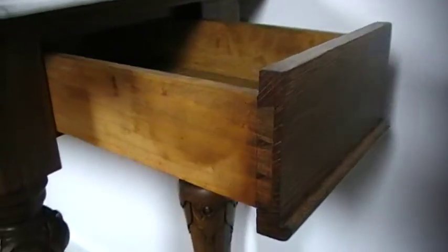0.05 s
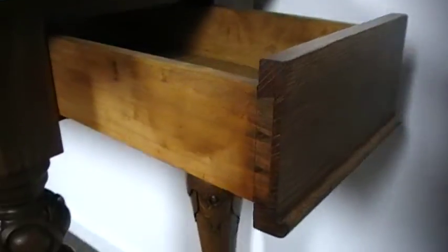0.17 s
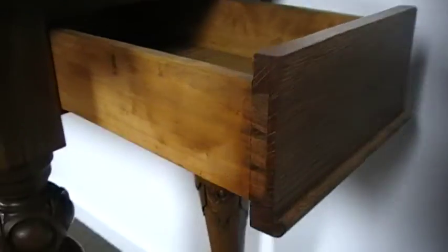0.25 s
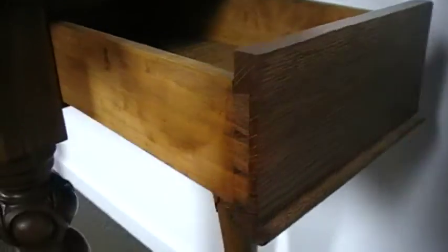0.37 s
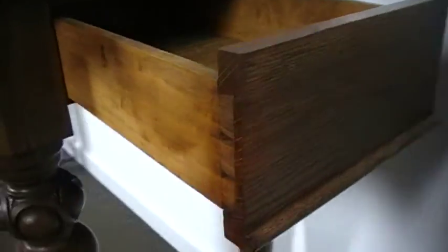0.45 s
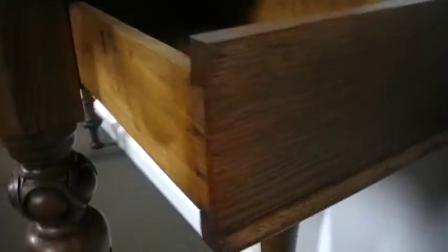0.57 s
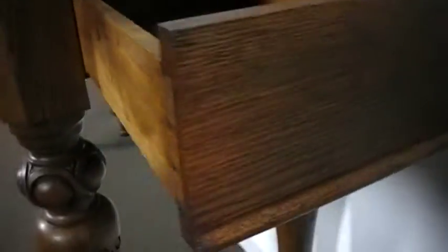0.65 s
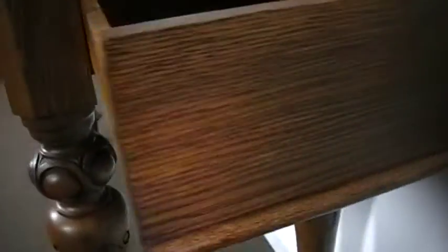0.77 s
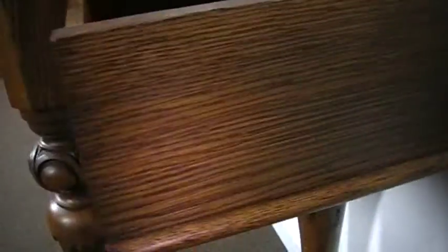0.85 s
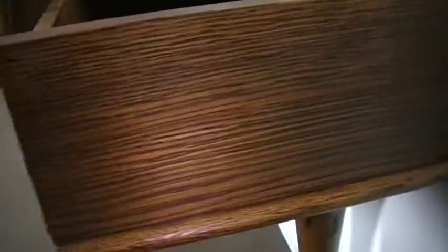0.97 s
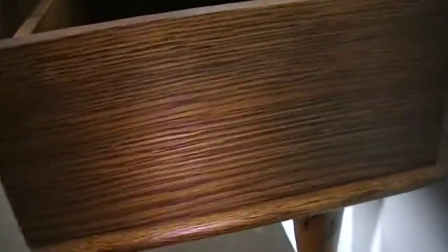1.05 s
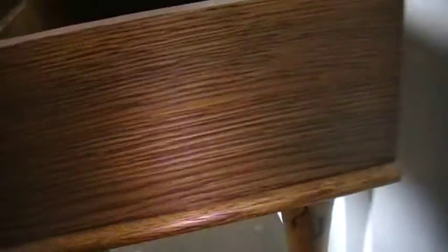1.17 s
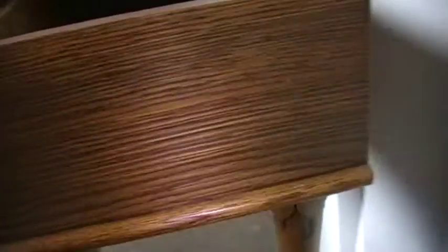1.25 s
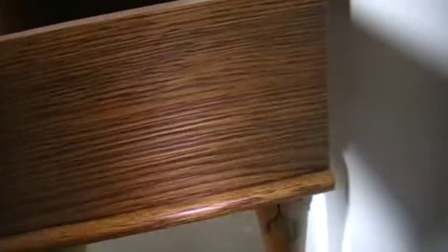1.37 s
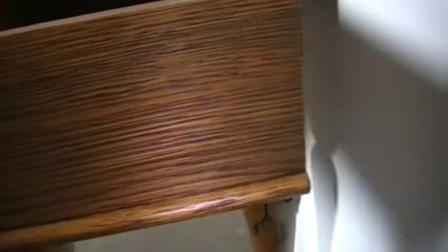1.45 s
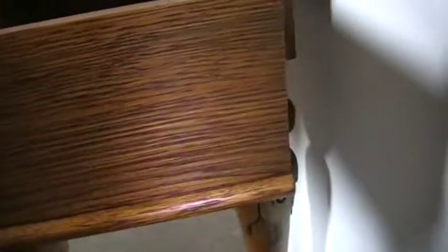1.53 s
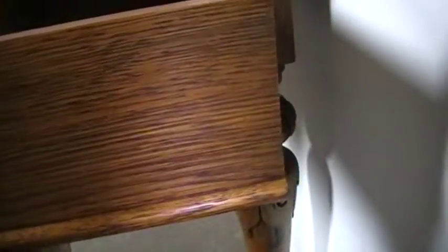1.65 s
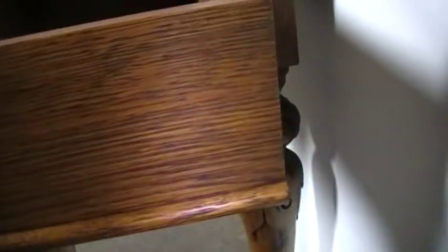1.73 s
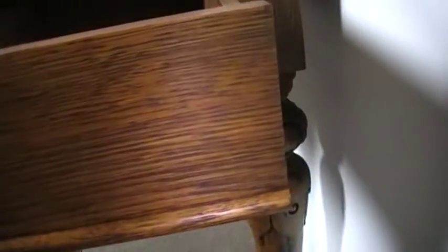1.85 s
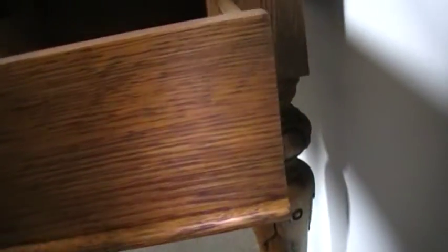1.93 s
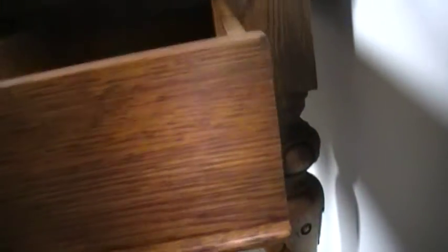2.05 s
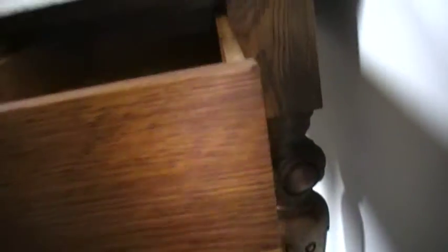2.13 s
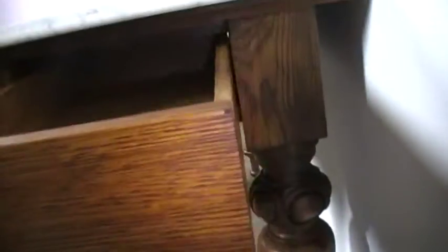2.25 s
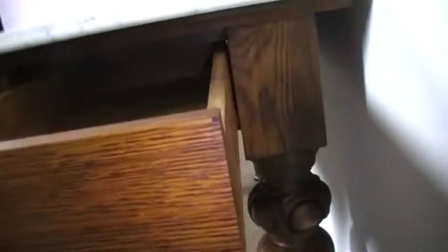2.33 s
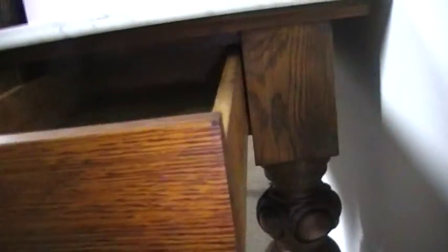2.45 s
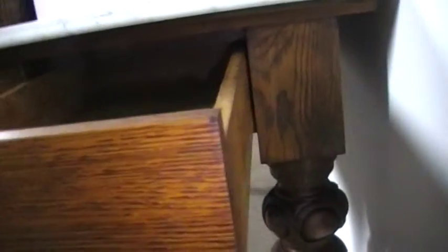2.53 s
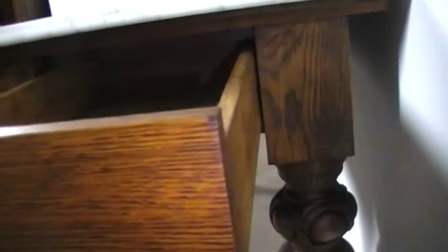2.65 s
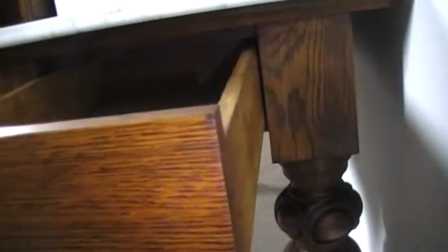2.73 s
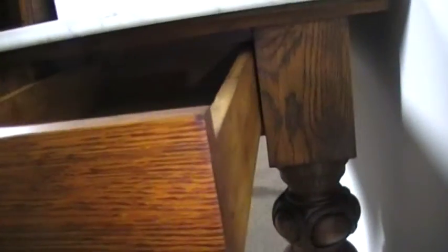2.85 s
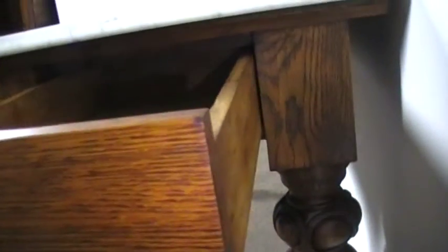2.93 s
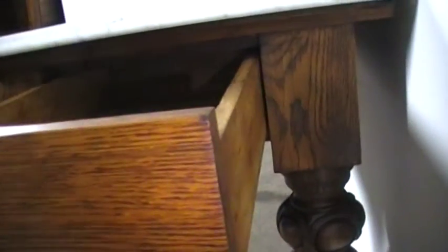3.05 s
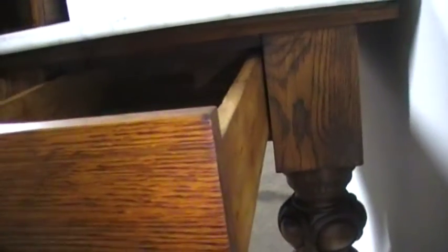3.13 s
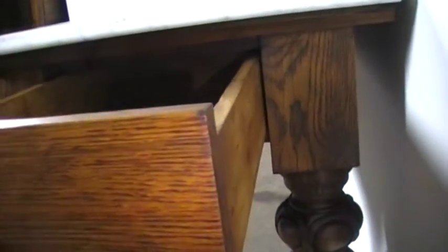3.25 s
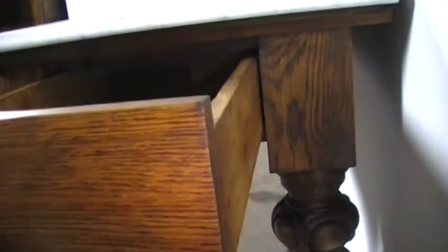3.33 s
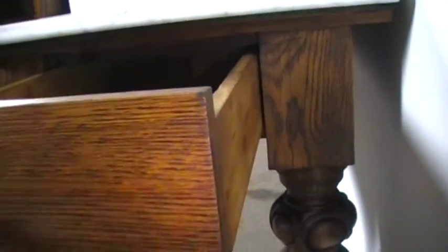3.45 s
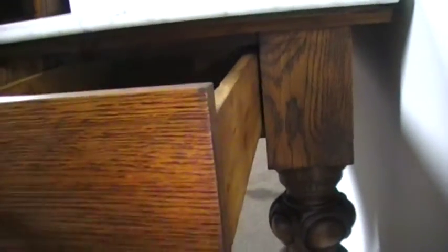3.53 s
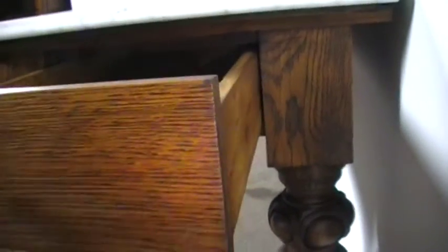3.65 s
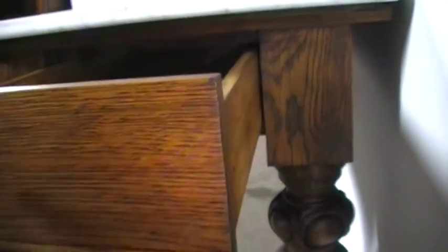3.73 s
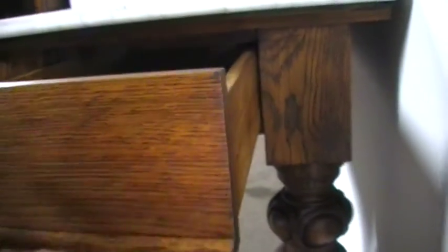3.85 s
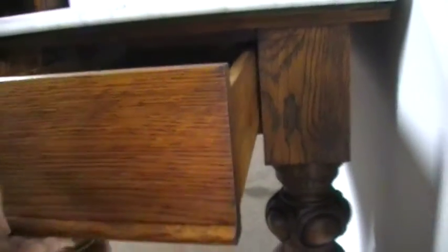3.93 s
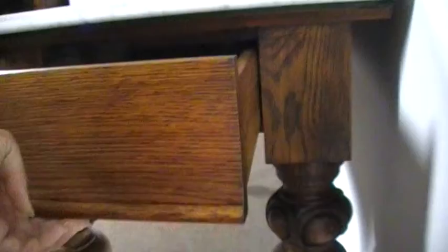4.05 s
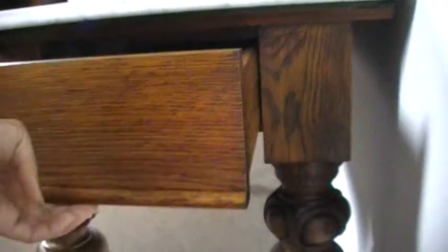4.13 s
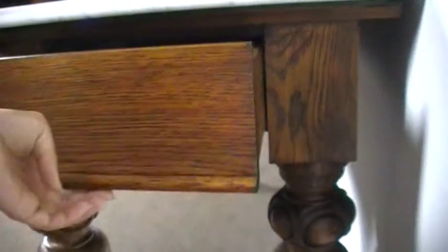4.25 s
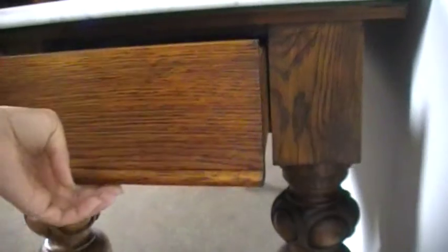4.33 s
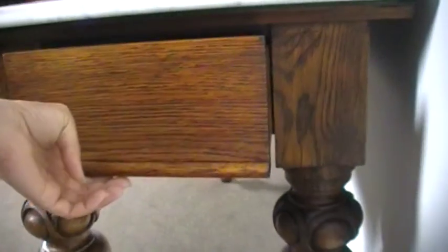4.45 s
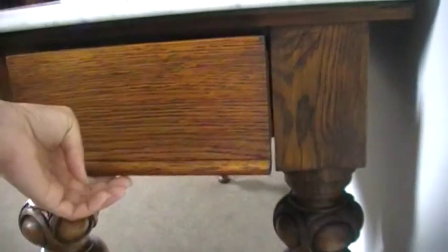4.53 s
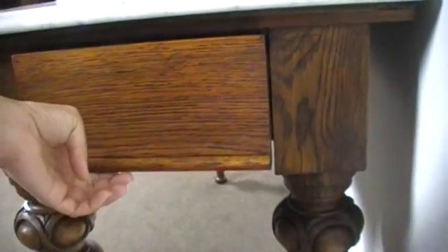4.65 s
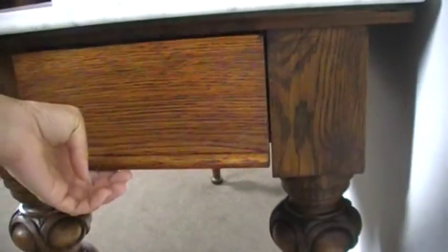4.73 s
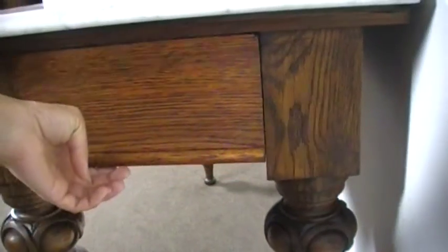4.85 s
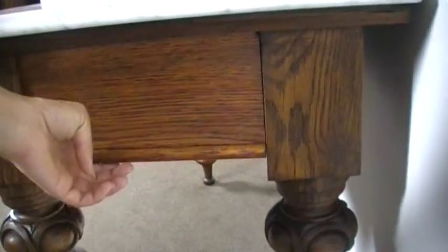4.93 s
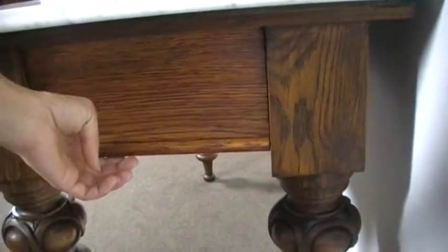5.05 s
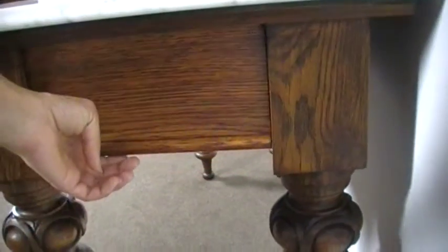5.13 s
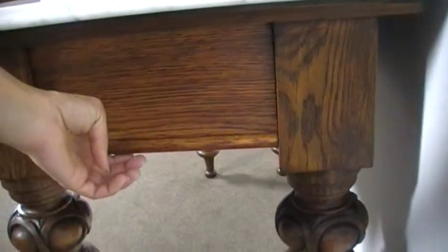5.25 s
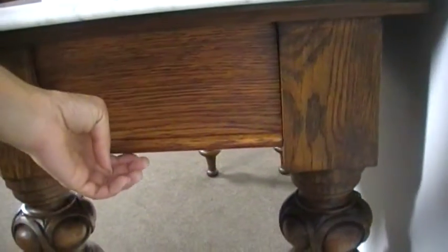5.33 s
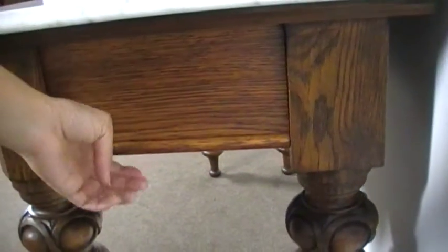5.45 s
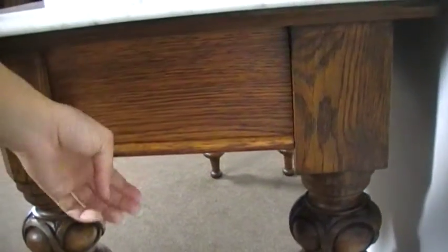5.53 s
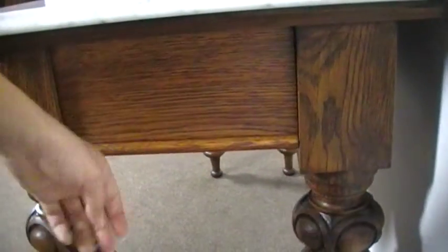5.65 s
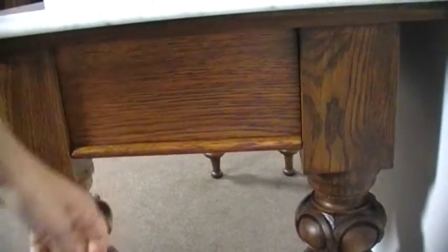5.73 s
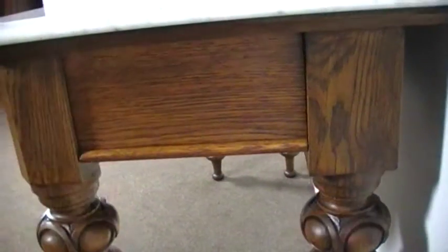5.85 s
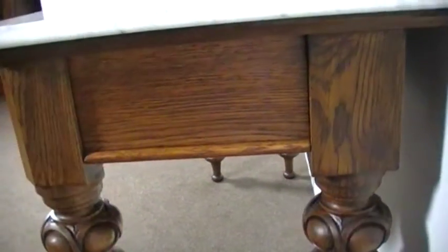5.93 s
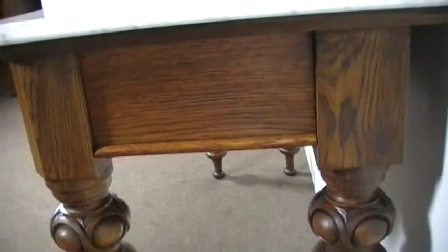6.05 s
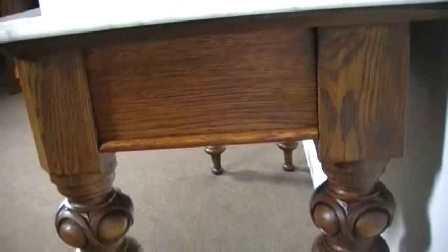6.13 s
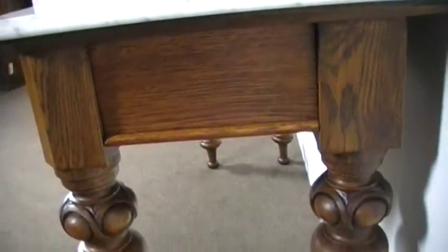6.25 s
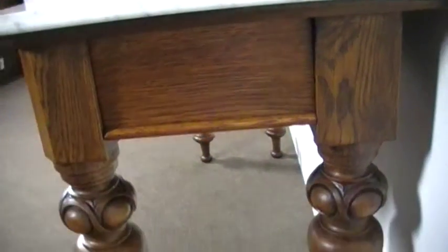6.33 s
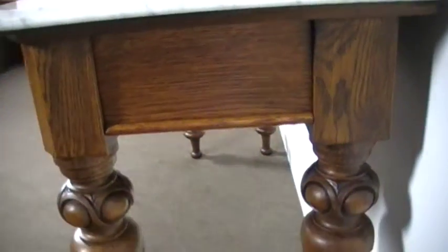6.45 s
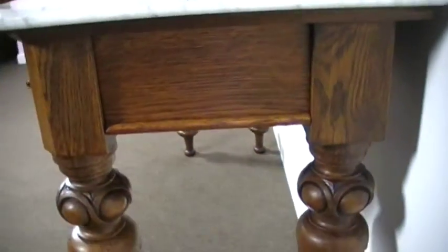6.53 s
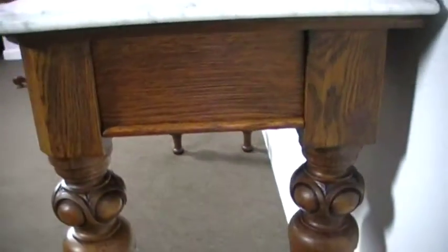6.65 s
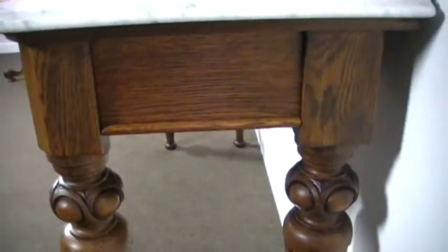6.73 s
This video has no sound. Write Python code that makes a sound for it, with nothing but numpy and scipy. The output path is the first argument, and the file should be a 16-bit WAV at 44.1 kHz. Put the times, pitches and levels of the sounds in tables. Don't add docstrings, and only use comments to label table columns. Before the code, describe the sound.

Close handheld pickup in a carpeted showroom. Cloth rubs and case ticks sit over low room noise. Hollow wooden bumps come first, then after a gap a drawer slides on dry wooden runners, catching and juddering with low woody moans and gritty hiss. It slams into its frame with a hard crack, rattles and leaves a brief reverberant tail, then near quiet with a faint shoe scuff.

```python
import sys
import numpy as np
from scipy import signal
from scipy.fft import rfft, irfft, next_fast_len
from scipy.io import wavfile
from scipy.ndimage import uniform_filter1d

SR = 44100
rng = np.random.default_rng(int(sys.argv[2]) if len(sys.argv) > 2 else 0)


def generate_wav(sig):
    pcm = np.round(np.clip(np.atleast_2d(sig).T, -1, 1) * 32767).astype(np.int16)
    wavfile.write(sys.argv[1], SR, pcm)


def volts_from_decibels(level):
    exponent = np.asarray(level, float) / 20
    return 10 ** exponent


N = 299429
HOP = 128
STROKE = slice(2 * SR, round(5.3 * SR))

# start in seconds, peak level in dB, contact time in ms,
# favoured pitch in Hz, log spread of pitch.
SLAM = [
    (4.9692, -4.5, 1.66, 1297, .4),
    (4.9701, -3.5, 1.43, 4010, 0.62),
    (4.972, -21.5, 8.5, 200, 0.44),
]


def evened(x):
    return x / np.sqrt(np.mean(x ** 2) + 1e-20)


def read(points, hz):
    f, value = np.transpose(points)
    return np.interp(np.log(hz + 1), np.log(f + 1), value)


def add(mix, s, sound):
    part = mix[..., round(s * SR):][..., :sound.shape[-1]]
    part += sound[..., :part.shape[-1]]


def colour(x, points):
    size = next_fast_len(x.shape[-1], True)
    gain = volts_from_decibels(read(points, np.fft.rfftfreq(size, 1 / SR)))
    return irfft(rfft(x, size) * gain, size)[..., :x.shape[-1]]


def resonate(x, hz, width):
    r = np.exp(-np.pi * width / SR)
    zeros = [(1 - r * r) / 2, 0, (r * r - 1) / 2]
    poles = [1, -2 * r * np.cos(2 * np.pi * hz / SR), r * r]
    return signal.lfilter(zeros, poles, x)


def drift(per_s):
    t = np.arange(0, N, HOP) / SR
    f = np.geomspace(per_s / 8, per_s, 12)
    phase = rng.random(12)
    return evened(np.sin(2 * np.pi * (f * t[:, None] + phase)) @ f ** -.5)


def fine(x, span=slice(None)):
    return np.interp(np.arange(N)[span], np.arange(0, N, HOP), x)


def peak_shape(t, s, rise, fall):
    return 1 - np.maximum((s - t) / rise, (t - s) / fall)


def swells(rows, width_share, grit):
    out = np.zeros(N)
    lead = 2000
    for s, length, hz, db in rows:
        part = grit[round(s * SR) - lead:][:round(length * SR) + lead]
        width = width_share * hz
        note = resonate(resonate(part, hz, width), hz, 2 * width)[lead:]
        add(out, s, volts_from_decibels(db) * evened(note) * signal.windows.tukey(len(note), .6))
    return out


def catches(per_s, spread_db):
    size = volts_from_decibels(spread_db * np.minimum(rng.exponential(1, N), 5)) * rng.standard_normal(N)
    return evened(size * (rng.random(N) < per_s / SR))


def hush():
    # frequency in Hz, density in dB per Hz.
    common_hush = [(15, -59), (25, -38), (99, -5), (195, -8), (427, -11.5), (545, -8), (714, -9.5),
                   (840, -8.5), (1520, -12.5), (2160, -15), (2350, -15.5), (9070, -27.5), (16000, -38)]
    opposed_hush = [(15, -61), (25, -32.5), (270, -10), (384, -8.5), (463, -7.5), (503, -8.5), (714, -6.5),
                    (775, -6), (7110, -29.5), (9570, -28.5), (16000, -46.5)]
    # frequency in Hz, rms level in dB.
    whine = [(726.7, -76), (1093, -82), (2186, -74.5), (3214, -88.5), (4377, -92), (15622, -101)]
    common_db, opposed_db = -63 - 2.5, -60
    t = np.arange(N) / SR
    mid = fine(volts_from_decibels(common_db + 0.62 * drift(3.04))) * evened(colour(rng.standard_normal(N), common_hush))
    for hz, db in whine:
        phase = 2 * np.pi * hz * t + fine(0.22 * drift(16))
        mid = mid + fine(volts_from_decibels(db + 0.79 * drift(8.8))) * np.sqrt(2) * np.sin(phase)
    side = fine(volts_from_decibels(opposed_db + 0.3 * drift(4.7))) * evened(colour(rng.standard_normal(N), opposed_hush))
    return np.array([mid + side, mid - side]) * volts_from_decibels(np.array([[.7], [-.7]]))


def rustle():
    # peak time in seconds, level in dB, rise in seconds,
    # fall in seconds, texture (0 rub, 1 scuff, 2 fizz).
    moves = [(.04, -62, 0.046, .2, 1.36), (.19, -55.5, 0.21, 0.17, 1.36), (.41, -62, 0.12, 0.079, 1.35),
             (.495, -60, 0.036, 0.21, 1.35), (.67, -61.5, 0.44, 0.1, 1.3), (.93, -65.5, 0.46, 0.62, 0.84),
             (.9, -67.5, 1, 1.6, 2.42), (1.78, -62, 0.11, 0.061, 0.79), (1.86, -68, 0.083, 0.12, 1.4),
             (2.05, -51, .006, 0.026, 1.2), (2.12, -58.5, 0.2, 0.099, 0.27), (2.121, -58.5, 0.1, 0.15, 1.4),
             (2.29, -56, 0.12, 0.11, 1.53), (2.44, -61.5, 0.54, 0.24, 0.35), (2.79, -62, 0.2, 0.55, 0.27),
             (2.8, -68, 0.46, 0.63, 1.5), (6.15, -77, 0.39, 0.24, 0.082), (6.43, -61, 0.18, 0.39, 1.2),
             (6.586, -55, 0.28, 0.027, 1.47), (6.742, -65, .03, 0.027, 1.5), (6.79, -71, .05, .05, 1.2)]
    # frequency in Hz, density in dB per Hz.
    rub_band = [(120, -0.5), (300, 11.5), (600, 10), (1000, -4), (2000, -46)]
    scuff_band = [(600, -17), (1000, -2), (1250, -5), (1550, -3.5), (1900, -6), (3500, -24.5)]
    fizz_band = [(1500, -21), (2600, 6), (5000, 1), (9000, -1.5), (12000, -10), (16000, -36)]
    # start in seconds, length in seconds, pitch in Hz,
    # rms level in dB.
    drags = [
        (.13, .05, 1730, -65),
        (.17, 0.032, 1390, -55),
        (0.498, 0.027, 1950, -62),
        (.55, 0.092, 1540, -65),
        (0.858, 0.054, 1300, -69),
        (6.387, 0.093, 1490, -57.5),
        (6.452, .07, 1350, -55),
        (6.51, .07, 1410, -51),
        (6.571, 0.033, 1220, -53),
    ]
    edge_db, texture_db = 21.5, 12.5
    t = np.arange(0, N, HOP) / SR
    power = np.zeros((3, len(t)))
    for s, db, rise, fall, texture in moves:
        swell_db = edge_db * (peak_shape(t, s, rise, fall) - 1)
        mismatch_db = texture_db * (np.arange(3)[:, None] - texture) ** 2
        power += volts_from_decibels(db + swell_db - mismatch_db) ** 2
    fibres = catches(9000, 1.6) * fine(volts_from_decibels(1.2 * drift(30)))
    out = volts_from_decibels(-7.5) * swells(drags, 0.2, fibres)
    for gain, band in zip(np.sqrt(power), (rub_band, scuff_band, fizz_band)):
        out += fine(gain) * evened(colour(fibres, band))
    return out


def ticks():
    # start in seconds, peak level in dB, ring in Hz, length in ms, # balance in
    # dB (the left port is louder than the right by half this).
    case_ticks = [(0.0368, -66, 3500, 1.8, -3.0), (0.1204, -54, 5000, 3.1, 3), (0.2976, -46, 5800, 2.1, -1),
                  (0.6294, -62, 4500, 1.3, 0), (1.8372, -68, 5000, 1.8, -2.5), (1.8627, -67, 5000, 2.8, 0),
                  (1.922, -63, 4960, 2.8, -3), (2.018, -56, 3900, 2.3, 0), (2.047, -66, 5000, 2.5, 1),
                  (2.118, -63, 5000, 3, 4), (2.263, -55, 3600, 2.7, -1), (2.289, -55, 5000, 2.3, -1.5),
                  (2.446, -59, 3750, 2.9, -2), (2.5905, -51, 6900, 3, 2), (3.1917, -61, 4000, 3, 0),
                  (3.24, -55, 5000, 7.1, 5), (3.898, -50, 4000, 3, 0), (4.0283, -41, 7000, 3.3, 2),
                  (4.277, -39, 10000, 3.8, 0), (3.268, -53, 4000, 3, 0), (3.67, -47, 7200, 3, 0),
                  (4.105, -47, 9000, 3, 0), (4.72, -50, 9000, 4, 2), (4.89, -40.5, 7500, 4, 3),
                  (5.2642, -56, 5000, 1.4, 3), (5.4534, -58.5, 5120, 2.4, 0), (6.59, -65, 4970, 2.8, 1),
                  (6.5994, -56.5, 4900, 1.3, -9), (6.7435, -59, 3000, 1.3, -4)]
    # start in seconds, peak level in dB, ring in Hz, length in ms, # balance in dB (the left
    scuffs = [
        (0.183, -52.5, 2500, 16, 10),
        (.484, -61, 4000, 15, 6),
        (0.516, -61, 3500, 10, 1),
        (6.568, -59, 5350, 12, 7),
    ]
    # start in seconds, peak level in dB, ring in Hz, balance in dB # (the left port is
    clacks = [(.036, -65, 915, 0), (.1204, -58.5, 2900, 2), (0.299, -58.5, 2900, 0),
              (0.41, -63, 1280, -3.0), (0.533, -58, 1310, 6), (.535, -63, 2000, 0), (0.66, -63, 900, 0),
              (0.609, -65, 1580, -3.0), (0.663, -60.5, 860, 6), (.666, -63, 1940, 0), (0.89, -63, 1290, 4),
              (0.91, -56, 1300, 4), (6.541, -52, 1380, -3.5), (6.543, -63, 2980, 0), (6.577, -54, 1200, 4)]
    tick_width_share, scuff_width_hz, clack_width_hz, clack_ms = 1.5, 7500, 280, 1.8
    rows = [(s, db, hz, tick_width_share * hz, ms, pan_db) for s, db, hz, ms, pan_db in case_ticks]
    rows += [(s, db, hz, scuff_width_hz, ms, pan_db) for s, db, hz, ms, pan_db in scuffs]
    rows += [(s, db, hz, clack_width_hz, clack_ms, pan_db) for s, db, hz, pan_db in clacks]
    out, t = np.zeros((2, N)), np.arange(2500) / SR
    grit = rng.standard_normal((len(rows), 2, 2500))
    for (s, db, hz, width, ms, pan_db), (common, other) in zip(rows, grit):
        ports = np.array([common, 0.45 * common + 1.9 * other])
        puff = t * np.exp(-t * 1000 / ms * 2.9) * ports
        tick = resonate(resonate(puff, hz, width), hz, 2 * width)
        pan = volts_from_decibels(np.array([[pan_db / 4], [-pan_db / 4]]))
        add(out, s, volts_from_decibels(db + 14.5) * tick / abs(tick).max() * pan)
    return out


def blows(rows, modes):
    crack_1k_db, crack_db_per_oct, crack_min_db, crack_max_db = -19, 11, -31, -2.5
    crack_reach = 7.3
    spot_luck_db, touch, long = 1.8, 0.46, 1500
    out, t = np.zeros(N), np.arange(16000) / SR
    luck = rng.standard_normal((len(rows), len(modes)))
    grit = rng.standard_normal((len(rows), long))
    hz, level_db, t60 = np.transpose(modes)
    rings = volts_from_decibels(-60 * t[:, None] / t60) * np.sin(2 * np.pi * hz * t[:, None])
    for (s, db, ms, spot_hz, spread), spot, rough in zip(rows, luck, grit):
        crack_db = crack_1k_db + crack_db_per_oct * np.log2(spot_hz / 1000)
        crack_db = np.clip(crack_db, crack_min_db, crack_max_db)
        u = t[:long] / (ms / 1000)
        force = rough * u * np.exp(-3 * u)
        force = force / np.linalg.norm(force) + touch * (np.arange(long) == round(ms * SR / 4000))
        nearness = 1 / (1 + (np.log(hz / spot_hz) / spread) ** 4)
        ring = signal.fftconvolve(rings @ (volts_from_decibels(level_db + spot_luck_db * spot) * nearness), force)
        crack_filter = signal.butter(N=2, Wn=min(crack_reach * spot_hz, .45 * SR), fs=SR)
        crack = signal.lfilter(*crack_filter, force)
        add(ring, 0, volts_from_decibels(crack_db) * abs(ring).max() * crack / abs(force).max())
        add(out, s, volts_from_decibels(db) * ring / abs(ring).max())
    return signal.sosfilt(signal.butter(N=2, Wn=130, btype="high", fs=SR, output="sos"), out)


def bump_open_drawer():
    # start in seconds, peak level in dB, contact time in ms, favoured pitch in Hz,
    # log spread of pitch.
    hand_bumps = [(2.0465, -37, 1.4, 1000, 0.091), (2.139, -25.5, 5.7, 1800, 0.74),
                  (2.1445, -17, 3.4, 470, 0.17), (2.1845, -21, 2.5, 600, 0.32),
                  (2.1875, -19.5, 2.7, 1310, 0.58), (2.194, -15, 3.3, 830, 0.3),
                  (2.208, -30, 3.8, 600, 0.46), (2.226, -28.5, 3.8, 350, 0.61), (2.231, -26, 4, 2200, 0.65),
                  (2.2345, -33, 3.2, 1600, 0.71), (2.238, -22.5, 2.9, 800, 0.39),
                  (2.152, -20.5, 4.6, 450, 0.24), (4.277, -29, 6.6, 190.5, .4)]
    # frequency in Hz, level in dB, t60 in seconds.
    open_modes = [(158, -30, 0.049), (225, -3.5, 0.16), (301, 4, 0.11), (425, -6.5, 0.087),
                  (466, -14, 0.11), (489.4, 3.5, 0.15), (530, -10, 0.031), (665, 4, 0.054),
                  (812, 0.5, 0.022), (990, 1.5, 0.029), (1250, 10, 0.02), (1460, -3.5, 0.073),
                  (1590, -20, 0.021), (2000, 3, 0.011), (2500, 6, 0.018), (3230, 0, 0.023)]
    return blows(hand_bumps, open_modes)


def jolts():
    # start in seconds, length in seconds, pitch in Hz, rms level in dB.
    hand_jolts = [
        (2.22, .07, 105, -60),
        (3.63, .07, 125, -61),
        (3.98, .08, 80, -67),
        (4.27, .06, 90, -61),
        (6.17, .1, 140, -71),
    ]
    return swells(hand_jolts, 0.7, rng.standard_normal(N))


def levels():
    # time in seconds, speed as hiss in dB, load on the runners in dB.
    push = [
        (3.119, -87, 10),
        (3.21, -56.5, -10),
        (3.37, -54, -4),
        (3.6, -46.5, -4),
        (3.7, -46, -5),
        (3.9, -40, -12),
        (4.2, -44.5, 6.5),
        (4.6, -49, 5),
        (5.02, -49, 9),
    ]
    # peak time in seconds, extra load in dB, rise in seconds, fall in seconds.
    snags = [
        (3.3, 7.5, 0.073, 0.034),
        (3.76, 9, 0.062, 0.52),
        (4.03, -1, .04, 0.024),
        (4.295, 10, 0.026, 0.23),
        (4.51, 4, 0.031, 0.19),
        (4.7, 8.5, .03, 0.061),
        (4.77, 5.5, .04, 0.02),
    ]
    # start in seconds, level in dB, hold in seconds,
    # tilt in dB from panel to hiss.
    shudders = [
        (2.14, -38.5, 0.034, 2),
        (2.177, -40, 0.021, 2.5),
        (2.227, -49.5, 0.029, -9),
        (4.9717, -23, 0.042, -1),
    ]
    # level re speed in dB, share of the load,
    # shudder level in dB, shudder sag in dB per second.
    part_db = (-2, 2, -2, 3)
    load_share = (0.74, 0.71, 0.62, 0.12)
    shake_db = (-5, 2, -4.5, -4)
    sag_db_per_s = (-39.5, 57, 296, 597)
    shake_rise_s, release_db_per_s = 0.002, 897

    def column(values):
        return np.array(values)[:, None]

    t = np.arange(N)[STROKE] / SR
    s, speed_db, load_db = np.transpose(push)
    load = np.interp(t, s, load_db)
    for at, db, rise, fall in snags:
        load = load + db * np.maximum(peak_shape(t, at, rise, fall), 0)
    speed = np.interp(t, s, speed_db, left=-140, right=-140)
    power = volts_from_decibels(speed + column(part_db) + column(load_share) * load) ** 2
    for at, db, hold, tilt_db in shudders:
        span = (t > at) & (t < at + .2)
        late = t[span] - at
        fade_db = column(sag_db_per_s) * np.minimum(late, hold) + release_db_per_s * np.maximum(late - hold, 0)
        lean_db = tilt_db * column(np.linspace(-1, 1, len(part_db)))
        shake = np.minimum(late / shake_rise_s, 1) * volts_from_decibels(db + column(shake_db) + lean_db - fade_db)
        power[:, span] += shake ** 2
    return np.sqrt(power)


def patchy(x):
    hz, t, z = signal.stft(x, SR, nperseg=256)
    patches = uniform_filter1d(rng.standard_normal(z.T.shape), size=20, axis=0)
    patches = evened(uniform_filter1d(patches, size=4, axis=1)).T
    gain_db = 2.2 * patches * (hz > 1400)[:, None] - 0.53
    return signal.istft(z * volts_from_decibels(gain_db), SR, nperseg=256)[1][:N]


def slide():
    # frequency in Hz, width in Hz, level in dB, change in dB as the drawer goes in.
    panel = [(159, 41, -13, 2.5), (215, 13, -6.5, 11), (263.7, 59, 6, 0), (316, 54, 5, -0.5),
             (391, 64, -9.5, 4.5)]
    boards = [(512.6, 62, 1, -1), (506.6, 73, 4, -3.5), (574, 61, 7, -1), (657.5, 91, 2, -8),
              (800, 58, -28, -30), (900, 66, -24.5, -6), (1000, 70, 1.5, -4.5), (1084, 69, -8, 0.2),
              (1280, 64, -0.5, 0.5)]
    sides = [(1600, 190, -6.5, -4), (1784, 110, -5.5, -3.5), (1917, 130, -8.5, -2.5), (2277, 56.4, -12, 1),
             (2370, 96, -8.5, -5.5), (2744, 140, -8.5, -5.5), (3350, 320, -15, -2.5), (3700, 135, -23, 9.5)]
    # frequency in Hz, density in dB per Hz.
    grain = [(530, -28.5), (900, -2.5), (1000, -5), (1590, -14), (1900, -5.5), (2250, -11), (2760, -12.5),
             (8760, -16.5), (12600, -25), (14000, -28), (14600, -43), (16000, -65.5)]
    # start in seconds, length in seconds,
    # # pitch in Hz, rms level in dB.
    sings = [(3.27, 0.086, 492, -48.5), (3.44, 0.24, 496, -55), (3.5, .15, 1020, -53),
             (3.55, 0.14, 700, -55), (3.73, 0.088, 270, -55), (3.74, 0.079, 695, -42),
             (3.75, 0.14, 1034, -42), (3.79, 0.13, 497, -40.5), (3.92, 0.11, 990, -49),
             (3.99, 0.063, 270, -41), (4.13, 0.2, 500, -56), (4.17, 0.1, 307, -42), (4.18, 0.11, 740, -39),
             (4.18, 0.15, 1000, -44), (4.2, 0.12, 288, -46), (4.64, 0.054, 1000, -47),
             (4.84, 0.089, 605, -49), (4.85, 0.091, 256, -44), (4.98, 0.055, 284, -29),
             (5.04, 0.053, 175, -29), (5.075, 0.07, 256, -37), (5.105, 0.033, 165, -41),
             (5.145, 0.027, 214.5, -41.5), (5.2, 0.068, 200, -58), (5.28, 0.064, 194, -57),
             (2.25, .05, 694, -48), (2.29, 0.046, 618, -50.5)]
    holds = [(3.8, 0.19, 460, -52), (3.91, 0.19, 337, -45.5), (4.27, 0.13, 211.5, -36),
             (4.3, 0.18, 1252, -42.5), (4.36, 0.22, 319, -39), (4.41, 0.14, 640, -37.5),
             (4.41, 0.16, 485, -41), (4.54, 0.21, 588, -48), (4.61, 0.18, 298, -39),
             (4.71, 0.21, 213, -41.5), (4.81, 0.19, 496, -45)]
    glints = [(3.24, .13, 1930, -59), (3.48, .18, 1770, -53), (3.5, .22, 2420, -55),
              (3.48, .28, 2730, -60.5), (3.71, .2, 1780, -46.5), (3.78, .24, 2100, -44),
              (3.83, .2, 2400, -61), (3.93, .38, 1900, -46.5), (4.08, .24, 1790, -49),
              (4.08, .18, 2350, -51), (4.24, .17, 2830, -60), (4.3, .16, 2050, -47.5),
              (3.75, .12, 3230, -64), (3.82, .22, 3620, -45), (3.87, .13, 4000, -51), (4.1, .14, 3230, -55),
              (4.12, .1, 4170, -54), (4.44, .18, 3600, -55), (4.46, .12, 3280, -53.5),
              (3.4, .28, 8340, -54), (3.52, .13, 6600, -53), (3.8, .25, 6700, -68), (3.75, .3, 10100, -68),
              (4.0, .2, 8000, -53), (4.07, .1, 9900, -56), (4.4, .2, 7300, -65), (4.7, .27, 8100, -54.5)]
    wander_db = 1.4
    rub = catches(5000, 2.5) * fine(volts_from_decibels(1.3 * drift(45)))
    sung = swells(sings, 0.072, rub) + swells(holds, .028, rub) + swells(glints, .07, rub)
    rub = rub[STROKE]
    depth = np.interp(np.arange(0, N, HOP) / SR, (3.8, 4.5), (-1, 1))
    parts = []
    for modes, skirt in ((panel, 2.5), (boards, 4.2), (sides, 4.5)):
        body = np.zeros(len(rub))
        for hz, width, db, shut_db in modes:
            drive = rub * fine(volts_from_decibels(db + shut_db * depth + wander_db * drift(7)), STROKE)
            body += resonate(resonate(drive, hz, width), hz, skirt * width)
        parts.append(body)
    dust = catches(9000, 0.77) * fine(volts_from_decibels(1.23 * drift(25)))
    parts.append(colour(0.45 * rub + 1.22 * dust[STROKE], grain))
    out = np.zeros(N)
    out[STROKE] = sum(gain * evened(part) for gain, part in zip(levels(), parts))
    return patchy(out + volts_from_decibels(-4.5) * sung)


def knock_home():
    # start in seconds, peak level in dB, contact time in ms, favoured pitch in Hz,
    # log spread of pitch.
    front_knocks = [
        (4.89, -52, 1.8, 4000, .9),
        (4.978, -19, 5, 1500, 0.9),
        (4.987, -14.5, 3.3, 710, 0.39),
        (4.9949, -12.5, 3.4, 599, 0.69),
        (5.005, -17, 5.9, 700, 1),
        (5.011, -32, 3, 7400, 0.073),
        (5.019, -16, 4.5, 900, 0.81),
    ]
    # frequency in Hz, level in dB, t60 in seconds.
    shut_modes = [(138, 1.5, 0.21), (165, 0, 0.199), (178, -6, 0.34), (200, -2, 0.17), (240, -1.5, 0.34),
                  (270, -1.5, 0.075), (312, -17, 0.05), (380, -11, 0.053), (463, 0.5, 0.028),
                  (640, -1.5, 0.073), (835, -13, 0.031), (950, -5.5, .03), (1093, 9.5, 0.0244),
                  (10260, 16.5, 0.0023), (1400, -1.5, 0.029), (1636, 8.5, 0.022), (7350, -7, 0.0078),
                  (1950, -11, 0.013), (2900, 1, 0.00327), (3970, -0.5, 0.0097), (5130, -13, 0.011),
                  (6370, -2.5, 0.014), (8930, 8, .005)]
    return blows(SLAM + front_knocks, shut_modes)


def thrown():
    # frequency in Hz, level in dB.
    thud = [(60, -18.5), (140, 9), (200, 6.5), (320, -2), (700, -3), (1200, 0), (2000, -9.5), (4000, -21.5),
            (8000, -31), (13000, -37)]
    out = np.zeros(N)
    out[round((SLAM[0][0] + .006) * SR)] = 22.8
    return colour(out, thud)


def room(x):
    # frequency in Hz, t60 in seconds.
    decay = [(100, 0.39), (200, 0.87), (400, 0.56), (1000, 0.71), (2500, 0.78), (5000, 0.78), (10000, 0.41)]
    taps = np.zeros((2, SR))
    at = np.arange(150, SR - 20, 20) + rng.integers(0, 20, (2, (SR - 151) // 20))
    np.put_along_axis(taps, at, rng.choice([-1., 1.], at.shape), 1)
    hz, t, z = signal.stft(taps, SR, nperseg=256)
    fading = z * volts_from_decibels(-60 * t / read(decay, hz)[:, None])
    tail = signal.istft(fading, SR, nperseg=256)[1]
    tail = tail + 0.56 * tail[::-1]
    return signal.fftconvolve(x[None], tail / np.linalg.norm(tail[0]), axes=1)[:, :N]


def scattered(x):
    # frequency in Hz, level in dB re direct.
    bend = [(100, -26), (400, -19), (1000, -13), (3000, -12), (7000, -5), (12000, -7)]
    smear = rng.standard_normal(600) * np.exp(-np.arange(600) / (.0025 * SR))
    side = colour(signal.oaconvolve(x, smear / np.linalg.norm(smear))[:N], bend)
    return np.array([x + side, x - side])


def capsule(x):
    low = signal.butter(N=3, Wn=173, btype="high", fs=SR, output="sos")
    high = signal.butter(N=3, Wn=10700, btype="low", fs=SR, output="sos")
    return signal.sosfilt(np.vstack([low, high]), x)


def scene():
    cloth, bumps, scrape, knocks = rustle(), bump_open_drawer(), slide(), knock_home()
    wet = room(volts_from_decibels(-11.5) * scrape + volts_from_decibels(-18.0) * bumps + volts_from_decibels(-15) * cloth + volts_from_decibels(-12.5) * thrown())
    lean = volts_from_decibels(np.array([[-.1], [.1]]))
    near = scattered(volts_from_decibels(0.73) * scrape + bumps + knocks) * lean + volts_from_decibels(0.77) * cloth
    return capsule(near + wet + ticks()) + jolts() + hush()


def low_pass(x):
    return signal.sosfilt(signal.butter(12, 15700, fs=SR, output="sos"), x)


def record(dry):
    # frequency in Hz, left-right balance in dB.
    balance = [(30, 1), (60, -5.5), (400, -6), (800, -4.5), (1300, -2.2), (4400, -1.8), (9000, -.5),
               (15000, .6)]
    left = colour(dry[0], [(hz, db / 2) for hz, db in balance])
    right = colour(dry[1], [(hz, -db / 2) for hz, db in balance])
    return low_pass(np.clip([left, right], -1, 1))


dry = scene()
out = record(dry)
generate_wav(out)
```